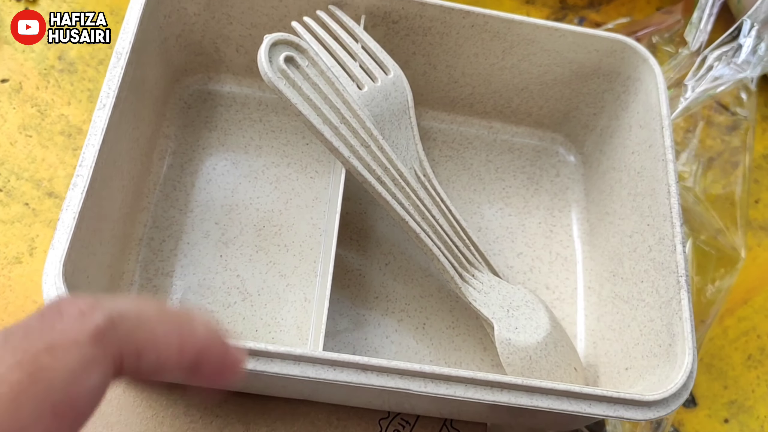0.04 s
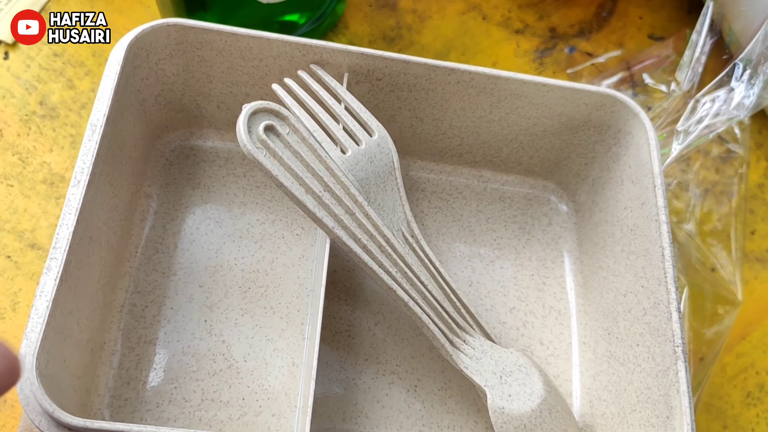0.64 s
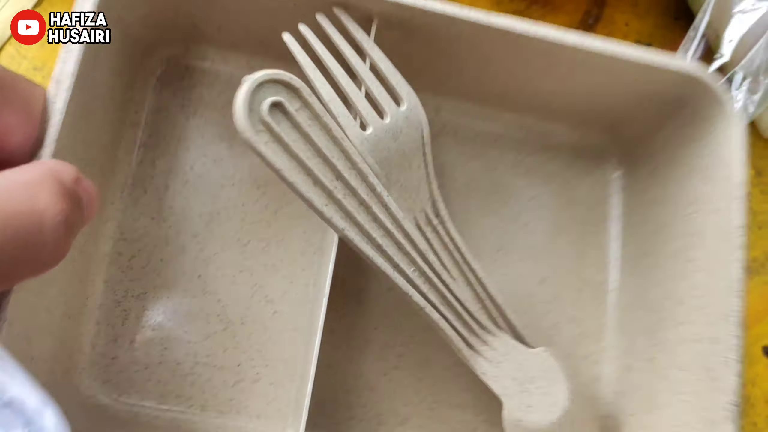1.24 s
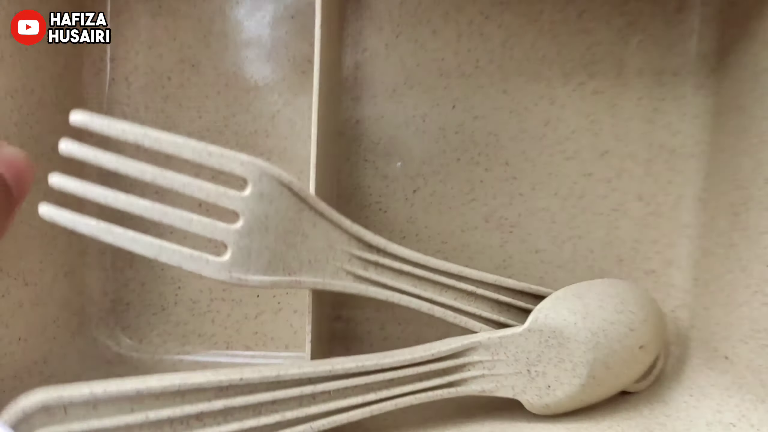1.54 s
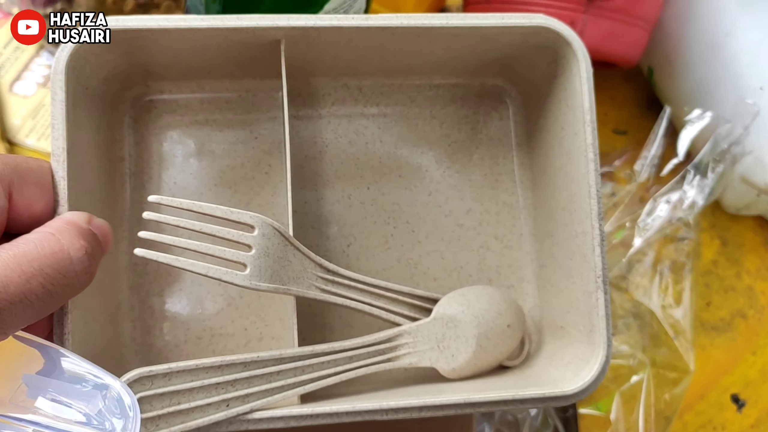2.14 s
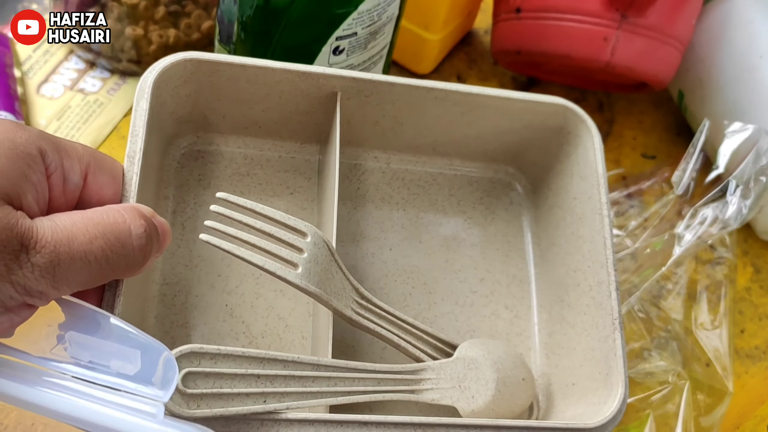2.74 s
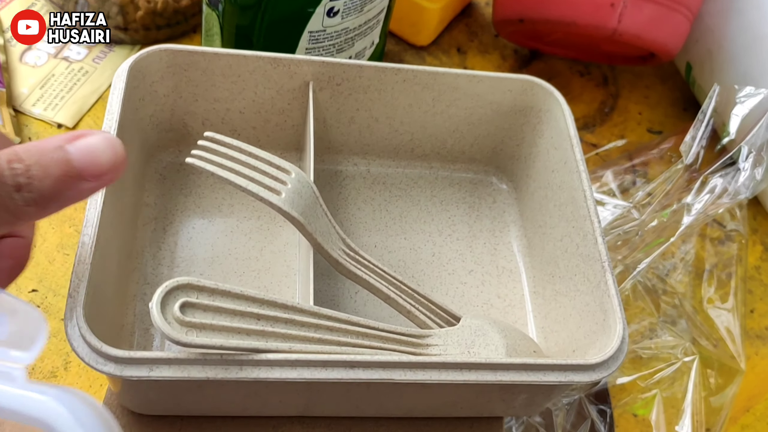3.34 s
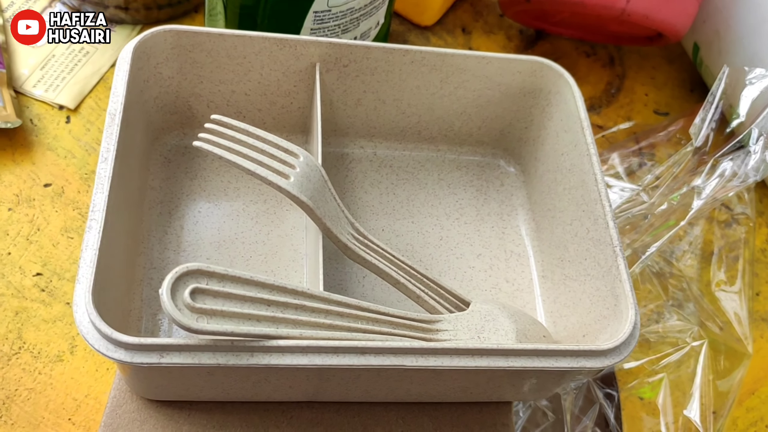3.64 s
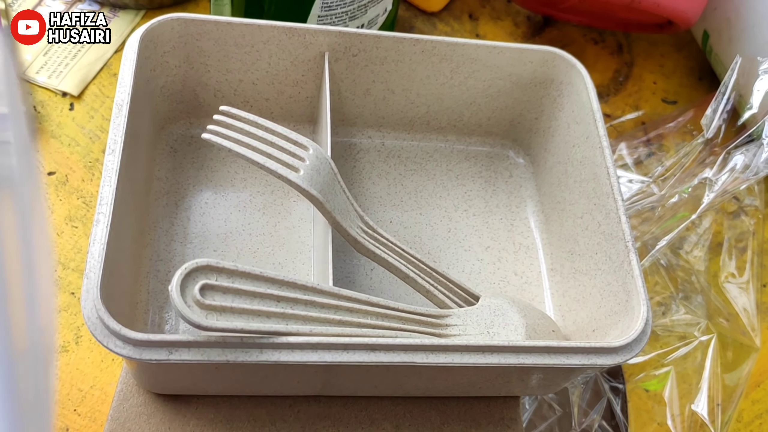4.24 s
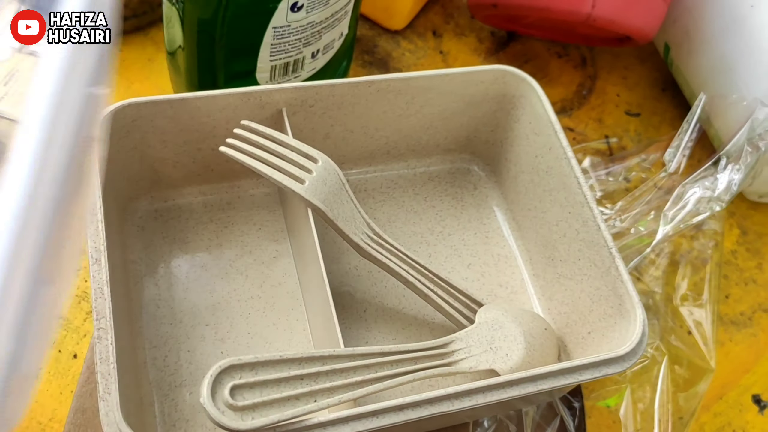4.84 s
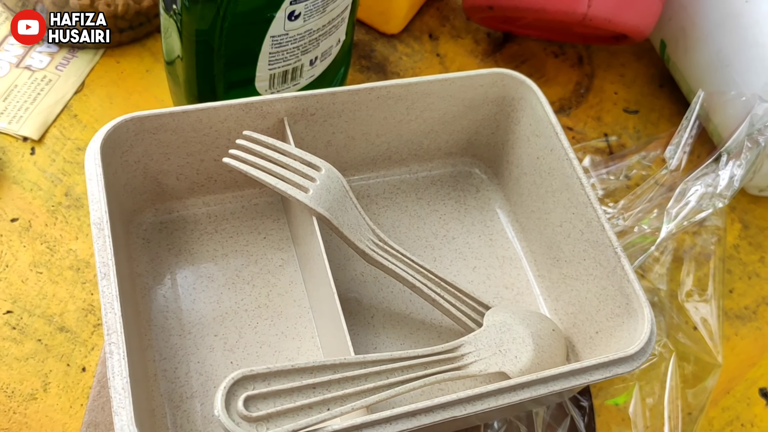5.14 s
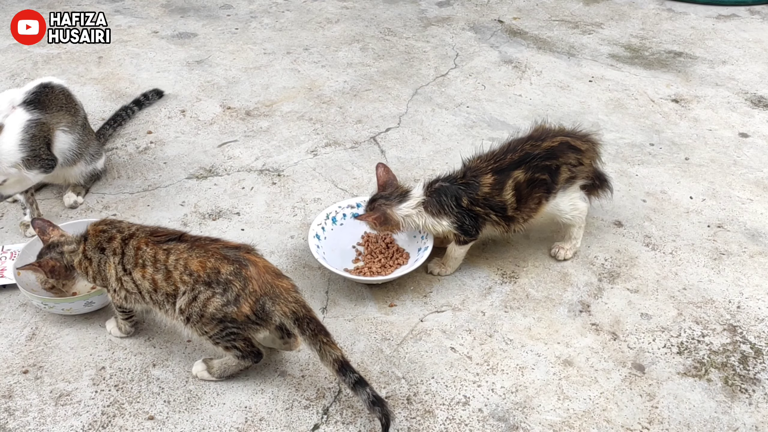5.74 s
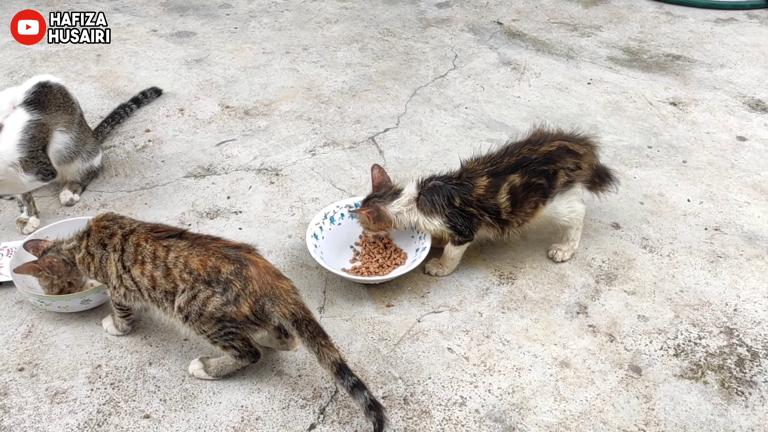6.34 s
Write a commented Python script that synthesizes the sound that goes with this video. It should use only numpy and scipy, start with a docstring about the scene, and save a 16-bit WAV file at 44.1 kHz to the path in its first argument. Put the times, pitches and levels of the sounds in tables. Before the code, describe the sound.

Close clicks, knocks and scrapes of a plastic lunch box, cutlery and lid indoors, then a brief dropout and a quiet yard.

```python
"""A table in a small room, the microphone close to a light plastic lunch box. A hand slides the box;
fork and spoon skid inside and bounce off its wall. It is set down on a carton with two knocks, then its
lid rattles and scrapes along the rim. Each blow or tiny slip clicks and rings the thin plastic.
A motor hums and birds call far off. The microphone cuts out briefly and resumes in a quiet yard."""
import sys
import numpy as np
from scipy import signal
from scipy.fft import rfft, irfft
from scipy.io import wavfile

SR = 44100
rng = np.random.default_rng(int(sys.argv[2]) if len(sys.argv) > 2 else 0)


def wav_record(signal):
    """Record a signal, one row per channel, as 16-bit PCM in the file named by sys.argv[1]."""
    frames = np.transpose(np.atleast_2d(signal))
    bounded = np.clip(frames, -1, 1)
    # unit amplitude maps onto the largest positive 16-bit level
    quanta = np.round(bounded * 32767).astype(np.int16)
    wavfile.write(sys.argv[1], SR, quanta)


N = 290178
TIME = np.arange(N) / SR
RING_T = np.arange(SR // 4) / SR
CUT_S = 5.514  # the room ends here

# Modes of the box and of its softer lid. Each row: frequency in Hz, level in dB, base T60 in seconds.
BOX_MODES = [(257, -9, 0.094), (350, -6, .11), (357, 2, 0.066), (415, 0.5, 0.099), (466, -27.5, 0.16),
             (546.3, 0.5, 0.088), (562, -13.5, 0.1), (794, -12.5, 0.1), (848, -5.5, .08), (921, 1.5, 0.048),
             (1160, -14.5, .07), (1330, -3, 0.018), (1520, -19.5, 0.031)]
LID_MODES = [(248, -8, 0.018), (304, -10.5, 0.1), (328, -12, 0.1), (354, 1.5, 0.086), (410, -7, 0.11),
             (487, -4.5, 0.086), (515, 0.5, 0.085), (656, -19.5, 0.037), (731, -5, 0.053),
             (784, -2.5, 0.075), (885, 2.5, 0.032), (956, -7.5, 0.046), (1037, -6, 0.04),
             (1077, -4.5, 0.025), (1297, -4, 0.025), (1540, -20.5, 0.044)]


def box_blows():
    """Box and cutlery bump together as the hand moves them."""
    # Each row: start in seconds, body level in dB, walls over floor in dB, click level in dB,
    # click centre in Hz, ring time factor.
    hits = [ (.194, -36, 1, -34, 4000, 0.23), (.4675, -38.5, 4.5, -15.5, 5000, 0.6),
            (.599, -54, 8, -28, 3160, 0.85), (1.213, -37.5, -1.5, -34, 5000, .6),
            (1.260, -46, 5, -28.5, 3300, 0.92), (1.3224, -41, -0.5, -21.5, 7100, 0.44),
            (1.4862, -28.5, 10, -21, 3000, 0.84), (1.511, -24.5, 17.5, -19.5, 4500, 0.49),
            (1.571, -30.5, 3, -14, 6000, .96), (1.611, -8, 20.5, 4, 3650, 0.85),
            (1.6831, -16.5, 22, -6, 2900, 0.59), (1.704, -28, 20, -23, 2502, .47),
            (2.8142, -33, 6, -24, 2200, 0.56), (2.859, -47.5, 18, -24.5, 3510, .45),
            (2.877, -49, 8, -33.5, 4300, .5), (2.9604, -34, -15, -26, 1500, 0.57),
            (3.2412, -28, 2, -27.5, 1970, 0.65), (3.291, -27, 12, -34, 3000, 0.33),
            (3.355, -28, 15, -26, 2550, .4)]
    return strike(hits, BOX_MODES, long_wall_db=2)


def cutlery_bounces(start_s=1.6235, gap_s=.0137, loss_db=3.5):
    """The cutlery rebounds from the long wall, evenly and ever weaker."""
    hits = [(start_s + k * gap_s, -23 - k * loss_db, -2, -10 - k * loss_db, 4500, .8) for k in range(4)]
    return strike(hits, BOX_MODES, long_wall_db=15)


def lid_rattle(click_hz=3250):
    """The lid lands on the rim one edge after the other, the second duller and more damped."""
    # Each row: start in seconds, body level in dB, walls over floor in dB, click level in dB,
    # lag of the second edge in seconds, its strength against the first in dB.
    landings = [ (4.412, -24, 2.5, -19.5, .010, -7), (4.4588, -17.5, 4.5, -10, .007, 3.5),
                (4.569, -17, 0.5, -15, .012, -15), (4.596, -25, 6, -14, .007, 5.5),
                (4.6926, -36, 4, -23, .011, -12), (4.7746, -13, 10.5, -5, .0135, -3),
                (4.8111, -19, 11.5, -11.5, .0133, 3.5), (4.845, -27.5, 3, -20, .01, -7)]
    hits = []
    for start, body_db, tilt_db, click_db, lag, second_db in landings:
        hits.append((start, body_db, tilt_db, click_db, click_hz, .95))
        hits.append((start + lag, body_db + second_db, tilt_db - 9,
                     click_db + second_db - 5, click_hz, .75))
    return strike(hits, LID_MODES, long_wall_db=-4.5)


def carton_knocks():
    """The box thuds on the hollow carton; the weight of the hand raises and damps the note."""
    # Each row: start in seconds, level in dB, pitch factor, ring time factor.
    knocks = [(2.8137, -14, 2.1, 0.43), (2.817, -12, 1.1, 0.89), (2.9608, -14, 1.45, 0.46),
              (2.9669, -23, 1.2, 0.63)]
    # The carton's dull modes. Each row: base frequency in Hz, level in dB, base T60 in seconds.
    carton_modes = [(355, 0, .05), (720, -17, .035), (1040, -29, .04)]
    out = np.zeros(N)
    for start, knock_db, pitch, ring in knocks:
        for hz, db, t60 in carton_modes:
            add(out, start, gain_of(knock_db + db) * ringing(hz * pitch, t60 * ring))
    return out


def sliding(slips_per_s=170, release_s=.04, contacts=6):
    """Several contact points stick and slip unevenly; each tiny slip rings the walls and ticks."""
    # Each row: start, rise and hold in seconds, drag in dB, grit in dB, walls over floor in dB,
    # the part that rings.
    strokes = [ (.002, 0.0035, 0.0096, -44.5, -52, 9, "box"), (.03, .06, 0.66, -62, -58.5, 3.5, "box"),
               (.25, 0.039, 0.008, -53, -47.5, 10, "box"), (.47, 0.035, 0.022, -54, -50.5, 2, "box"),
               (.66, 0.033, 0.012, -66, -48, 6, "box"), (.83, 0.017, 0.025, -72, -51.5, 0, "box"),
               (.885, 0.032, .02, -55, -44.5, -2, "box"), (0.937, 0.018, .004, -45.5, -46.5, 22, "box"),
               (1.11, 0.012, 0.037, -48.5, -58.5, -2, "box"),
               (1.212, 0.0062, 0.072, -39.5, -55.5, -10.5, "box"),
               (1.44, .105, 0.097, -27.5, -31, 3, "cutlery"), (3.11, 0.02, .11, -46, -56.5, -3, "box"),
               (3.24, 0.0081, 0.11, -36.5, -52.5, 1, "box"), (4.46, .01, 0.15, -28, -41, -2.5, "lid"),
               (4.485, 0.031, 0.016, -31, -31, 6, "lid"), (4.694, 0.0061, .125, -33.5, -44.5, 7, "lid"),
               (4.828, 0.014, 0.079, -36, -49, 3, "lid")]
    # Fork and spoon on the box floor. Each row: frequency in Hz, level in dB, base T60 in seconds.
    cutlery_modes = [(343, -7.5, 0.13), (425, 0, 0.066), (590, -5.5, 0.061), (810, -7, .05), (947, -3, .07),
                     (1163, -1.5, 0.1), (1287, 2, 0.033), (1446, -6.5, 0.035)]
    parts = {"box": BOX_MODES, "cutlery": cutlery_modes, "lid": LID_MODES}
    out, judder = np.zeros(N), gain_of(2 * drift(180))
    for start, rise, hold, drag_db, grit_db, tilt_db, part in strokes:
        length = rise + hold + release_s
        inside = (TIME > start) & (TIME < start + length)
        t = TIME[inside] - start
        speed = np.minimum(t / rise, 1) * np.minimum((length - t) / release_s, 1) ** 2
        for _ in range(contacts):
            sizes = gain_of(1.5 * np.minimum(rng.exponential(1, SR), 3)) * rng.choice([-1, 1], SR)
            slipping = rng.random(SR) < slips_per_s / SR
            force = speed * unit_rms(judder[inside] * (sizes * slipping)[:len(t)])
            walls = wall_ring(parts[part], tilt_db, ring=.68, detune=.034, spread_db=5, rise_s=.00099)
            tick = click(centre_hz=3300, ring=.61, crack_t60=.0059, modes_db=-21, slope_db=3, low_hz=850)
            for db, response in ((drag_db, walls), (grit_db, tick)):
                scrape = signal.fftconvolve(force, response / np.linalg.norm(response))
                add(out, start, gain_of(db) * scrape)
    return out / np.sqrt(contacts)


def strike(hits, modes, long_wall_db):
    """Each blow rings the struck part and clicks at the point of contact."""
    out = np.zeros(N)
    for start, body_db, tilt_db, click_db, click_hz, ring in hits:
        add(out, start, gain_of(body_db) * wall_ring(modes, tilt_db, ring, long_wall_db))
        add(out, start, gain_of(click_db - 2) * click(click_hz, ring))
    return out


def wall_ring(modes, tilt_db, ring, long_wall_db=0, detune=.007, spread_db=1, rise_s=.0019):
    """Thin panels ring; where they are struck and gripped shifts each mode a little."""
    # Where floor, long wall and short wall answer most, in Hz.
    panel_hz = [377, 550, 824]
    panel_db = [-tilt_db / 2, long_wall_db, tilt_db / 2]  # contact high on the box favours the walls
    out = np.zeros(len(RING_T))
    for (hz, db, t60), (shift, scatter) in zip(modes, rng.standard_normal((len(modes), 2))):
        level_db = db + np.interp(hz, panel_hz, panel_db) + spread_db * scatter
        out += gain_of(level_db) * ringing(hz * (1 + detune * shift), t60 * ring)
    return out * (1 - np.exp(-RING_T / rise_s))


def click(centre_hz, ring, crack_t60=.011, modes_db=-23, slope_db=5, low_hz=1000):
    """Hard plastic on plastic: a brief crack, a dense chatter and a few high tones."""
    # Stiff modes of cutlery and rim. Each row: frequency in Hz, level in dB, base T60 in seconds.
    stiff_modes = [(1972, 9.5, 0.025), (2287, 5, 0.069), (2480, -0.5, 0.09), (2857, -1.5, 0.1),
                   (3125, 4.5, .06), (3334, 6, 0.037), (3826, -1, 0.044), (4690, -5.5, .06),
                   (5150, -14.5, .06), (5630, -3.5, 0.05), (6530, -2.5, 0.12), (6550, -2.5, .11),
                   (7610, -0.5, 0.1)]
    size = len(RING_T)
    chatter = gain_of(-13) * decay(.065 * ring)
    contact = rng.standard_normal(size) * (decay(crack_t60) + chatter)
    for hz, db, t60 in stiff_modes:
        strength, shift = rng.standard_normal(2)
        contact += gain_of(modes_db + db) * strength * ringing(hz * (1 + .0018 * shift), t60 * ring)
    bins_hz = np.fft.rfftfreq(2 * size, 1 / SR) + 1
    peak_db = -slope_db * np.log2(bins_hz / centre_hz) ** 2
    bass_loss_db = 10 * np.log10(1 + (low_hz / bins_hz) ** 4)
    colour_db = np.maximum(peak_db - bass_loss_db, -60)
    log_gain = np.log(gain_of(np.r_[colour_db, colour_db[-2:0:-1]]))
    minimum_phase = np.exp(signal.hilbert(log_gain).conj())[:len(bins_hz)]  # keeps the attack sharp
    return irfft(rfft(contact, 2 * size) * minimum_phase)[:size]


def birds():
    """Far birds whistle, chip, chirp and peep, clear or hoarse, blurred by distance."""
    # Sagging whistles. Each row: start in seconds, length in seconds, level in dB.
    whistles = [(0.331, 0.2, -58.5), (1.759, 0.27, -57), (2.85, .18, -61)]
    # Falling chips. Each row: start in seconds, opening pitch in Hz, level in dB, hoarseness 0-1.
    chips = [(1.96, 5900, -55.5, .7), (2.03, 4920, -52.5, 0.95), (2.15, 4720, -50.5, 0.73),
             (2.26, 4580, -51.5, 0.91), (6.455, 4060, -48, 0.18)]
    # Level peeps. Each row: start in seconds, pitch in Hz, level in dB, octave in dB, hoarseness 0-1.
    peeps = [(2.91, 2650, -53.5, -27, 0.64), (2.955, 3050, -52.5, -24, .6), (3.11, 2076, -56.5, 1, .5)]
    calls = [(start, length, 1350, 1350 * .91, db, -27, .55) for start, length, db in whistles]
    calls += [(start, .04, hz, hz * .7, db, -7, hoarse) for start, hz, db, hoarse in chips]
    calls += [(2.28 + k * .096, .05, 1680, 2250, -62, -27, .3) for k in range(4)]  # rising chirps
    calls += [(start, .057, hz, hz, db, octave_db, hoarse) for start, hz, db, octave_db, hoarse in peeps]
    out, rasp = np.zeros(N), .025 * drift(150) + .1 * drift(2000)
    for start, length, start_hz, end_hz, db, octave_db, hoarse in calls:
        size = round(length * SR)
        hz = np.geomspace(start_hz, end_hz, size) * (1 + hoarse * rasp[round(start * SR):][:size])
        phase = 2 * np.pi * np.cumsum(hz) / SR
        voice = np.sin(phase) + gain_of(octave_db) * np.sin(2 * phase)
        add(out, start, gain_of(db) * signal.windows.tukey(size, .7) * voice)
    return gain_of(-1) * out + gain_of(-4) * echoes(out, t60=.25, damp_hz=7000)


def air():
    """Moving air rumbles softly, first by the table, then in the yard."""
    # The air's spectrum in each place. Each row: frequency in Hz, relative density in dB.
    room_spectrum = [(12, -37), (20, 4), (70, -5.5), (101, -4.5), (163, -8.5), (189, -6), (265, -14),
                     (291, -10), (321, -15.5), (520, -17.5), (843, -23.5), (1150, -26.5), (6400, -36),
                     (8320, -73.5), (14100, -120)]
    yard_spectrum = [(12, -43), (20, -3.5), (114, -5.5), (145, -12.5), (218, -10), (284, -13), (496, -22),
                     (729, -19), (974, -25), (1740, -28.5), (1870, -29), (6400, -37.5), (8320, -34.5),
                     (14100, -120)]
    noise = np.where(TIME > CUT_S, coloured(yard_spectrum), coloured(room_spectrum))
    return gain_of(-46 + drift(17)) * noise


def motor_hum():
    """A motor hums, each partial wavering in level and phase."""
    # Each row: frequency in Hz, rms level by the table in dB, rms level in the yard in dB.
    partials = [(53.6, -61.5, -60), (96.9, -56, -62), (107, -63, -55), (143.2, -57, -51),
                (190.2, -57, -55.5), (248.6, -61, -58), (294.3, -63.5, -54), (481, -68, -74),
                (654, -71.5, -75), (703, -74.5, -64), (821, -68, -63), (970, -75.5, -72)]
    out = np.zeros(N)
    for hz, room_db, yard_db in partials:
        level_db = np.where(TIME > CUT_S, yard_db, room_db) + 1.8 * drift(5.1)
        out += np.sqrt(2) * gain_of(level_db) * np.sin(2 * np.pi * hz * TIME + .14 * drift(4.3))
    return out


def hiss():
    """A thin hiss at the top of the microphone's range, fainter in the yard."""
    noise = coloured([(20, -55), (6300, -37), (6900, -4), (7500, -3.5), (8200, -10.5), (9000, -36.5)])
    return noise * gain_of(np.where(TIME > CUT_S, -68, -61))


def echoes(x, t60, damp_hz):
    """Diffuse reflections that die away, dull at the top."""
    tail = rng.standard_normal(len(RING_T)) * decay(t60) * (RING_T > .004)
    tail = signal.sosfilt(signal.butter(1, damp_hz, fs=SR, output="sos"), tail)
    return signal.oaconvolve(x, tail / np.linalg.norm(tail))[:N]


def gain_of(db):
    """Decibels to amplitude."""
    return 10 ** (np.asarray(db) / 20)


def unit_rms(x):
    """Scales to rms 1."""
    return x / np.sqrt(np.mean(x ** 2) + 1e-20)


def decay(t60):
    """Envelope that has lost 60 dB after t60 seconds."""
    return np.exp(-np.log(1000) * RING_T / t60)


def ringing(hz, t60):
    """One struck mode: a dying sine."""
    return decay(t60) * np.sin(2 * np.pi * hz * RING_T)


def add(mix, start_s, sound):
    """Mixes a sound in at start_s."""
    part = mix[round(start_s * SR):][:len(sound)]
    part += sound[:len(part)]


def coloured(points):
    """Noise of rms 1 with the given (Hz, dB) spectrum."""
    hz, db = np.transpose(points)
    shape_db = np.interp(np.log(np.fft.rfftfreq(N, 1 / SR) + 1), np.log(hz + 1), db)
    return unit_rms(irfft(rfft(rng.standard_normal(N)) * gain_of(shape_db), N))


def drift(turns_per_s):
    """Random wander of rms 1."""
    knots = np.arange(0, N / SR + 1, 1 / turns_per_s)
    return unit_rms(np.interp(TIME, knots, rng.standard_normal(len(knots))))


def lowpass(x, hz, taps):
    """Steep low-pass."""
    return signal.oaconvolve(x, signal.firwin(taps, hz, window=("kaiser", 9), fs=SR), "same")


def scene():
    """The box close by in a small room, then the yard; birds, air and motor lie behind both."""
    box = box_blows() + cutlery_bounces() + lid_rattle() + carton_knocks() + sliding()
    # Small panels radiate little bass.
    box = signal.sosfilt(signal.butter(3, 200, "high", fs=SR, output="sos"), box)
    room = gain_of(-24.5) * echoes(box, t60=.24, damp_hz=4000)
    return (box + room + birds() + air() + motor_hum() + hiss())[None]


def record(dry, resume_s=5.675, fade_s=.13, bump_s=5.914, bump_rise_s=.052, ceiling=.91):
    """A narrow-band microphone clips on the hardest blow, drops out and fades back with a bump."""
    live = np.where(TIME < CUT_S, 1, np.clip((TIME - resume_s) / fade_s, 0, 1))
    settling = np.maximum(TIME - bump_s, 0) / bump_rise_s
    subsonic_bump = gain_of(-6) * settling * np.exp(-settling)
    heard = lowpass(dry[0] * live + subsonic_bump, hz=7840, taps=161)
    return lowpass(np.clip(heard, -ceiling, ceiling), hz=15500, taps=511)[None]


dry = scene()
out = record(dry)
wav_record(out)
```